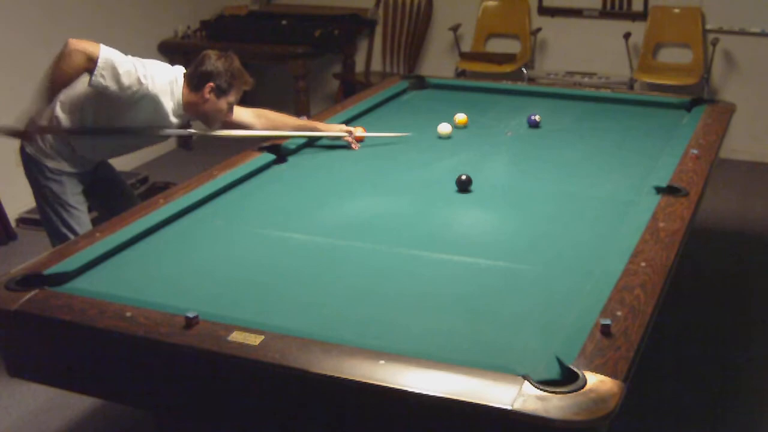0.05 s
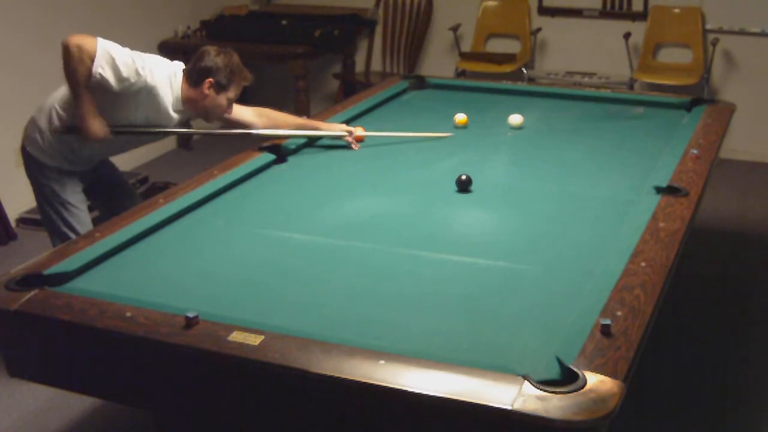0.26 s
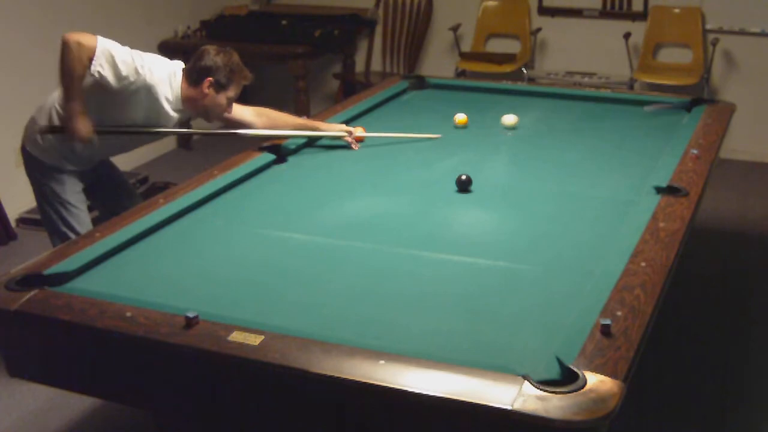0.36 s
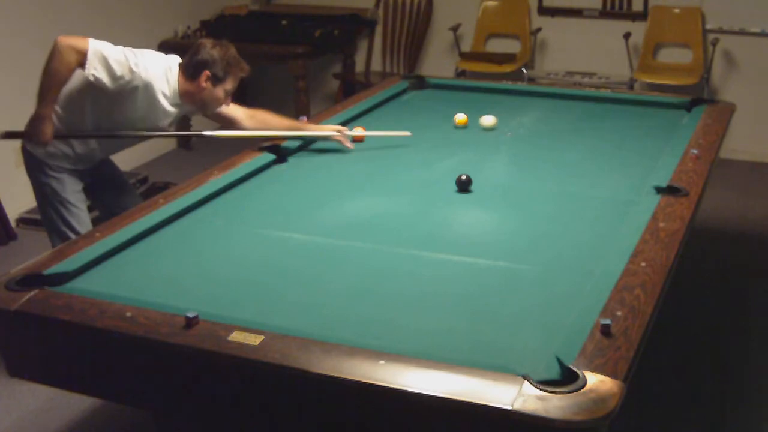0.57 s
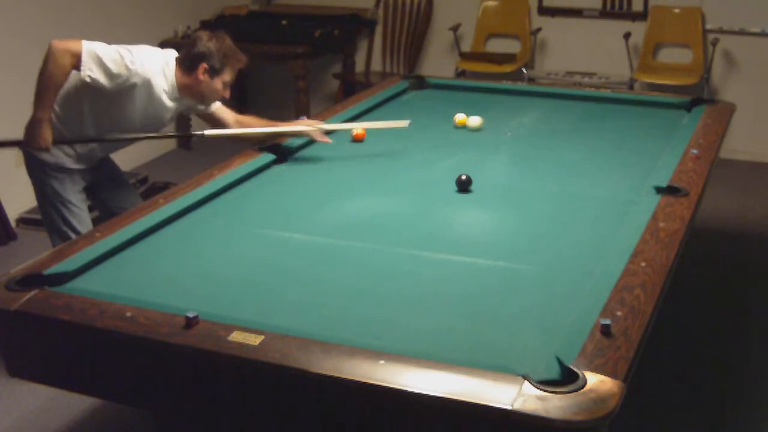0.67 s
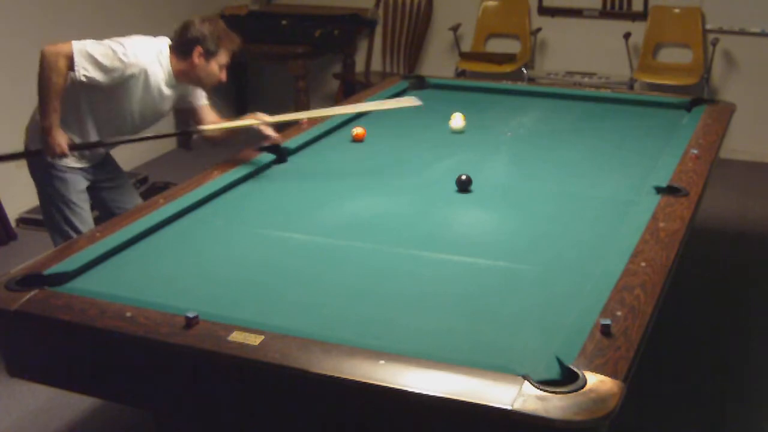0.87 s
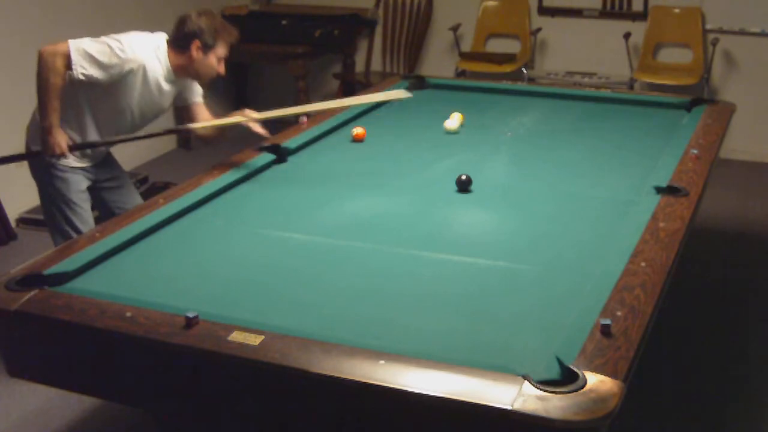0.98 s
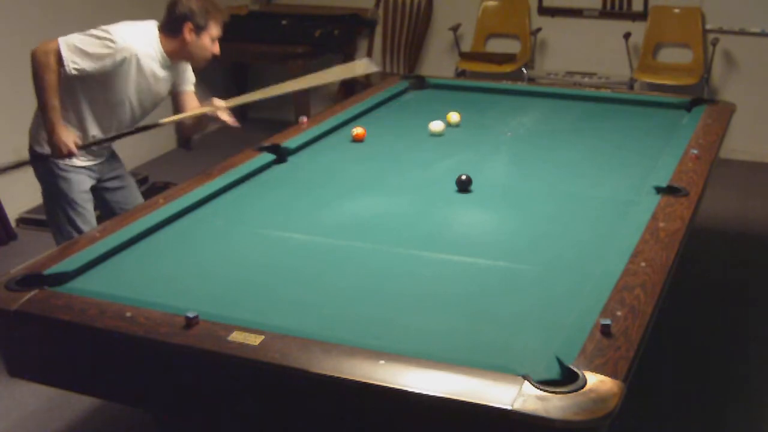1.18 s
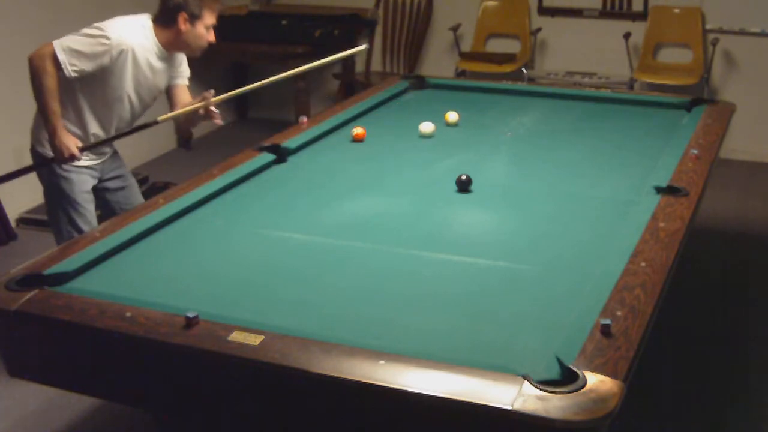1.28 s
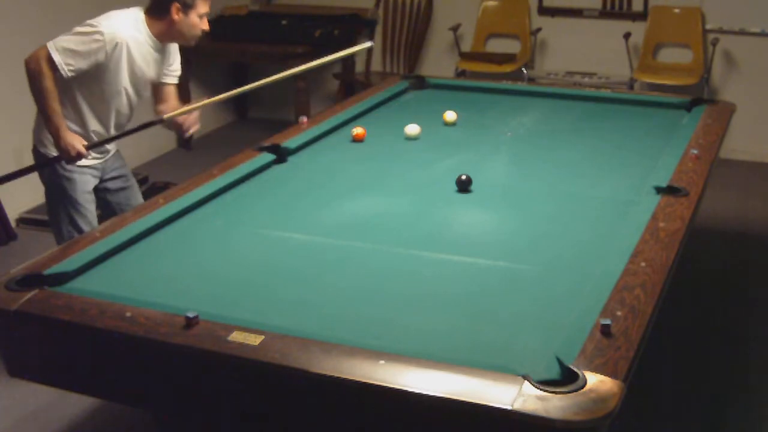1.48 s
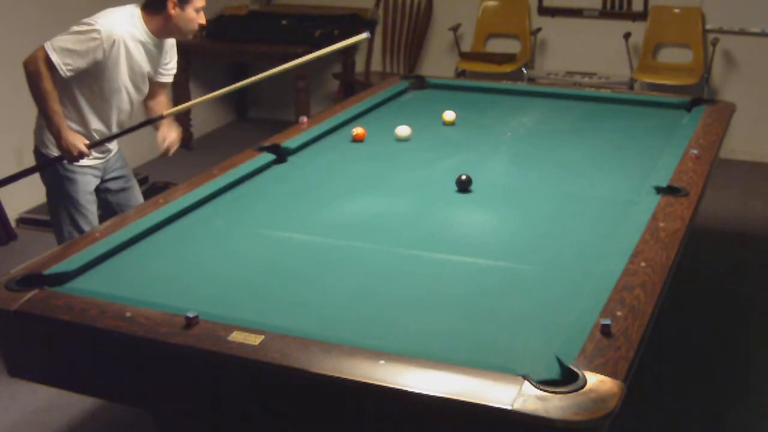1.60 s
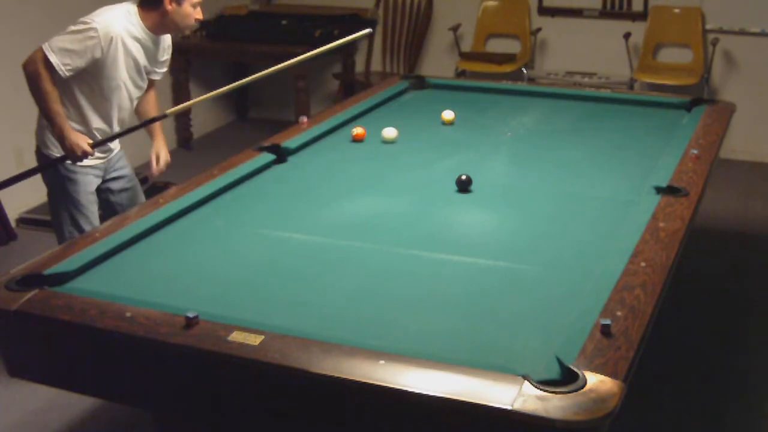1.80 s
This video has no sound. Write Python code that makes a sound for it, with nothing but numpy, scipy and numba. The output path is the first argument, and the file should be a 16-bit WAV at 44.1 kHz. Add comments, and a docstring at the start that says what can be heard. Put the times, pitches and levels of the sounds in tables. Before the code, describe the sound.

A hard pool shot: the cue cracks against a ball, which clacks sharply into another, and that one slams into a pocket and rattles down. The blows ring in a bare, faintly humming room, slightly overloading a nearby microphone.

```python
"""A hard pool shot in a bare games room, heard from a stereo microphone within earshot of the table.
First only room noise and mains hum. At 0.21 s the cue cracks against the cue ball and its tip slips off;
at 0.30 s that ball clacks into an object ball, which slams into a pocket at 0.56 s and rattles down
until about 1 s. The room rings after every blow, and the loud ones overload the microphone input."""
import sys
import numpy as np
from scipy import signal
from scipy.fft import rfft, irfft
from scipy.io import wavfile
from numba import njit

SR = 44100
rng = np.random.default_rng(int(sys.argv[2]) if len(sys.argv) > 2 else 0)


def dump_mix(stems):
    """Bounce the given channels to the path in sys.argv[1] as a 16-bit WAV at rate SR."""
    frames = np.atleast_2d(stems).T  # one column per channel
    limited = np.clip(frames, -1, 1)  # hard clip at full scale
    pcm = np.round(limited * 32767).astype(np.int16)
    wavfile.write(sys.argv[1], SR, pcm)


N = 81585


def undb(db):
    """Decibels to gain."""
    return 10 ** (np.asarray(db) / 20)


def clock(samples=N):
    """Time of every sample in seconds."""
    return np.arange(samples) / SR


def unit(x):
    """Scale to unit energy."""
    return x / np.sqrt(np.sum(x ** 2) + 1e-18)


def read(points, hz):
    """Value of a (frequency, value) table on a log-frequency axis."""
    freqs, values = np.array(points, float).T
    return np.interp(np.log(hz + 1e-3), np.log(freqs), values)


def colour(x, points):
    """Causal filter that follows (frequency [Hz], level [dB]) points."""
    size = 4096
    hz = np.arange(size // 2 + 1) * SR / size
    cepstrum = irfft(np.log(undb(read(points, hz))))
    cepstrum[1:size // 2] *= 2  # fold to minimum phase
    cepstrum[size // 2 + 1:] = 0
    return signal.fftconvolve(x, irfft(np.exp(rfft(cepstrum))))[:len(x)]


def low_cut(x, hz):
    """First-order high-pass."""
    return signal.sosfilt(signal.butter(1, hz, "high", fs=SR, output="sos"), x)


def fade(t, t60):
    """Fall by 60 dB in t60 seconds."""
    return np.exp(-np.log(1000) * t / t60)


def burst(spectrum, t60):
    """Many dense vibrations dying together: coloured noise of unit energy."""
    t = clock(SR // 3)
    return unit(colour(rng.standard_normal(len(t)) * fade(t, t60), spectrum))


def ring(modes):
    """Struck modes, each a dying sine; unit energy in all."""
    t = clock(SR // 3)
    return unit(sum(undb(db) * unit(np.sin(2 * np.pi * hz * t) * fade(t, t60)) for hz, db, t60 in modes))


def add(out, seconds, db, sound):
    """Mix a sound in at the given moment and level."""
    start = int(seconds * SR)
    out[start:start + len(sound)] += undb(db) * sound[:N - start]


# width of the sound field at the microphone (frequency [Hz], side over mid [dB])
STEREO_WIDTH = [(60, -17.5), (500, -22), (1200, -23.5), (2500, -16), (5000, -7), (10000, -1.5), (16000, -2)]

def stereo(mid, side):
    """Two capsules close together: alike in the bass, apart in the treble."""
    side = colour(side, STEREO_WIDTH)
    return np.array([mid + side, mid - side])


# noise of the quiet room (frequency [Hz], relative level [dB])
ROOM_NOISE = [(25, -14), (58, 5.5), (90, -3.5), (170, -6), (270, 2.5), (470, -2.5), (680, -8.5),
              (870, -6.5), (1100, -12), (2000, -16), (5000, -21), (10000, -23), (15000, -25.5)]

def room_tone():
    """All around the microphone: room noise, a wavering mains hum and a faint high whine."""
    t = clock()
    mid, side = (np.sqrt(N) * unit(colour(rng.standard_normal(N), ROOM_NOISE)) for _ in range(2))
    hum_hz, whine_hz = 122.4, 7865
    waver_db = 6 * np.cos(2 * np.pi * (t - .06) / .68)  # swells every 0.68 s
    hum = undb(-56 + waver_db) * np.sin(2 * np.pi * hum_hz * t)
    whine = undb(-67) * np.sin(2 * np.pi * whine_hz * t)
    return undb(-44.5) * stereo(mid, side) + np.sqrt(2) * (hum + whine)


# ringing of the cue shaft (frequency [Hz], relative level [dB], t60 [s])
SHAFT_MODES = [(610, -9, 0.064), (700, -22, 0.081), (899, -4, 0.05), (1172, 2, 0.037), (1480, 0, 0.36),
               (1655, -6, 0.13), (1909, 2.5, 0.12), (2590, -1.5, 0.18), (2880, -27, .1), (3200, -27, .08),
               (4250, -19, 0.035)]
# dull knock of the leather tip (frequency [Hz], relative level [dB])
TIP_SPECTRUM = [(40, -44), (90, -12.5), (180, -15), (330, -8), (650, -5), (1300, -7), (3000, -9),
                (4300, -19.5), (5200, -24.5), (7000, -19), (10000, -26), (13000, -27.5), (16000, -13)]

def cue_strike():
    """On the table, the tip knocks the cue ball and the shaft rings."""
    out, strike_s = np.zeros(N), .2068
    add(out, strike_s, db=11.5, sound=ring(SHAFT_MODES))
    add(out, strike_s, db=13, sound=burst(TIP_SPECTRUM, t60=.051))
    return out


# reflections from the slate, rails and ceiling (delay [ms], level [dB])
EARLY_REFLECTIONS = [(.9, -23), (1.9, -11), (3.3, -3), (6.5, -24.5)]

def near_paths(samples):
    """The shortest ways to the microphone: straight from the table, then off the nearest surfaces."""
    response, direct_db = np.zeros(samples), -3
    for ms, db in [(0, direct_db)] + EARLY_REFLECTIONS:
        add(response, ms / 1000, db, np.ones(1))
    return response


# decay of the bare room (frequency [Hz], t60 [s])
ROOM_DECAY = [(80, 0.46), (300, 0.62), (700, 0.61), (1500, 0.52), (2500, 0.51), (5000, 0.43), (9000, 0.53),
              (16000, 0.33)]
# colour of the sound off the walls (frequency [Hz], gain [dB])
WALL_COLOUR = [(3000, 1), (9000, -0.5), (12000, 1.5), (16000, -4.5)]

def reverberation():
    """From farther off, dense reflections off hard walls; each band dies at its own rate."""
    size, build_s = 65536, .0015
    t, hz = clock(size), np.arange(size // 2 + 1) * SR / size
    noise, tail = rfft(rng.standard_normal(size)), 0
    for centre, t60 in ROOM_DECAY:
        band = read([(f, f == centre) for f, _ in ROOM_DECAY], hz)
        tail = tail + irfft(noise * band) * fade(t, t60)
    onset = 1 - np.exp(-t / build_s)
    return colour(unit(tail * onset), WALL_COLOUR)


# scrape of the chalked tip (frequency [Hz], relative level [dB])
SCRAPE_SPECTRUM = [(1000, -34), (4000, -18), (7000, -3.5), (11000, 5.5), (13500, 5), (15500, -5)]

def tip_scrape():
    """Just after the strike, the chalked tip slips off the ball with a brief, bright tick."""
    out, t, slip_s = np.zeros(N), clock(SR // 20), .003
    slip = rng.standard_normal(len(t)) * np.exp(-(t / slip_s) ** 6)
    add(out, seconds=.2094, db=5, sound=unit(colour(slip, SCRAPE_SPECTRUM)))
    return out


# how well a ball radiates (frequency [Hz], relative level [dB])
BALL_SPECTRUM = [(100, -21), (500, -24.5), (1000, -15), (2300, -0.5), (4200, -6.5), (8000, -7.5),
                 (12000, -1.5), (16000, -3)]

def ball_clack():
    """Along the table, two balls press together for an instant and radiate one sharp pulse."""
    out, contact_ms = np.zeros(N), .28
    skew = .8  # under 1: the balls press together faster than they part
    progress = np.minimum(clock(SR // 20) * 1000 / contact_ms, 1)
    force = np.abs(np.sin(np.pi * progress ** skew)) ** 1.5
    add(out, seconds=.2958, db=26.5, sound=unit(colour(force, BALL_SPECTRUM)))
    return out


# blows in the pocket (time [s], click level [dB], click centre [Hz], knock level [dB], thump level [dB])
RATTLE_BLOWS = [(.5562, -7, 1000, 10, -5), (.5612, 28, 1343, 21.5, 7), (.604, 22.5, 1156, 17, -19),
                (.645, 17, 1180, 14.5, -7), (.686, 13, 1110, 9.5, 0), (.722, -3.5, 1180, 9, -24),
                (0.754, 3.5, 1800, 1.5, -8.5), (.767, 3.5, 1800, -9, -1.5), (.796, -7, 1230, -13, -8.5),
                (.864, -5.5, 1850, -13, -33), (.874, -1.5, 1810, 4.5, -39), (.891, -37, 1700, -6, -11.5),
                (.934, -10.5, 1180, 3, -25), (.975, -10, 1200, -9, -19), (1.034, -17, 1300, -14, -21.5)]
# hard click on the rim (frequency [multiple of the centre], relative level [dB])
CLICK_SPECTRUM = [(.1, -27.5), (.45, -6), (.7, -2.5), (1, 1), (1.5, -4.5), (2.2, -16), (4, -20.5),
                  (10, -35)]
# hollow knock of the pocket liner (frequency [Hz], relative level [dB])
KNOCK_SPECTRUM = [(40, -12.5), (190, -23.5), (280, -4.5), (420, 2.5), (620, 0), (850, -2.5), (1250, -5.5),
                  (2000, -9), (3200, -26), (16000, -81.5)]
# ringing of the liner and rail (frequency [Hz], relative level [dB], t60 [s])
LINER_MODES = [(315.5, 3, 0.093), (407, 3, 0.07), (519, 3, 0.12), (598.5, 4, 0.6), (709, -2, 0.24),
               (845, 7, 0.11), (1183, 4, 0.11), (1363, -1.5, 0.13), (1660, 2, 0.15), (1980, 5, 0.12)]
# low thump of the table frame (frequency [Hz], relative level [dB], t60 [s])
THUMP_MODES = [(66.7, -24, 0.25), (93, -19, 0.1), (122, -26, 0.18), (168.8, 17.5, 0.21), (247, 13, 0.098)]

def pocket_rattle():
    """At the table's edge the ball rattles down: each blow clicks, knocks the liner, thumps the frame."""
    out = np.zeros(N)
    liner, frame = undb(-9) * ring(LINER_MODES), ring(THUMP_MODES)
    for seconds, click_db, click_hz, knock_db, thump_db in RATTLE_BLOWS:
        click_spectrum = [(ratio * click_hz, db) for ratio, db in CLICK_SPECTRUM]
        add(out, seconds, click_db, burst(click_spectrum, t60=.016))
        add(out, seconds, knock_db, burst(KNOCK_SPECTRUM, t60=.04) + liner)
        add(out, seconds, thump_db, frame)
    return out


def scene():
    """At the microphone: each blow arrives by the near paths and through the room, over the room tone."""
    room = stereo(reverberation(), reverberation())
    near = near_paths(room.shape[1])
    impacts = cue_strike() + ball_clack() + pocket_rattle()
    blows = signal.fftconvolve(impacts[None], near + room, axes=1)
    tick = signal.fftconvolve(tip_scrape()[None], near + undb(-3) * room, axes=1)  # a little drier
    return undb(7) * (blows + tick)[:, :N] + room_tone()


@njit
def follow(x, attack_s, release_s):
    """Level follower with separate rise and fall times."""
    out, level = np.empty(len(x)), 0.
    for i in range(len(x)):
        level += (x[i] - level) / (SR * (attack_s if x[i] > level else release_s))
        out[i] = level
    return out


def record(dry):
    """Microphone input: a slow gain control yields too late to stop clipping; bass and top are cut."""
    x = low_cut(dry, hz=84)
    level = follow(np.abs(x).mean(0), attack_s=.053, release_s=.45)
    threshold_db, share_removed = 3.5, .083
    x = x * (1 + level / undb(threshold_db)) ** -share_removed
    ceiling, knee = .49, 9.4
    x = x / (3.5 + np.abs(x / ceiling) ** knee) ** (1 / knee)  # overload flattens the peaks
    x = low_cut(x, hz=15)  # AC coupling
    top_cut = signal.firwin(201, cutoff=15150, fs=SR)
    return signal.fftconvolve(x, top_cut[None], mode="same", axes=1)


dry = scene()
out = record(dry)
dump_mix(out)
```